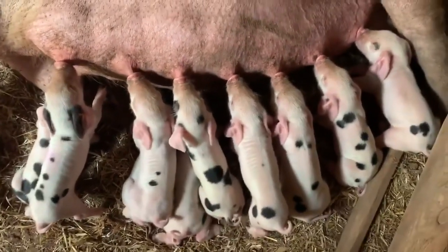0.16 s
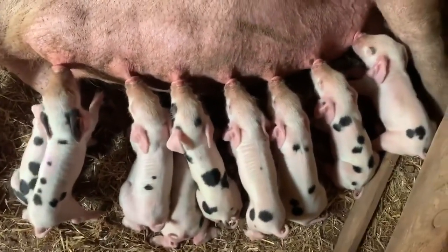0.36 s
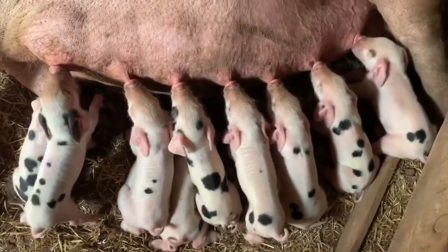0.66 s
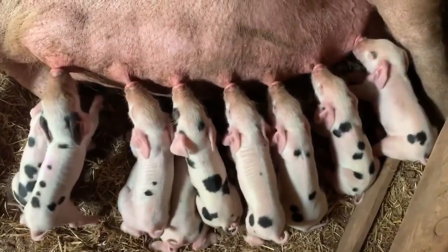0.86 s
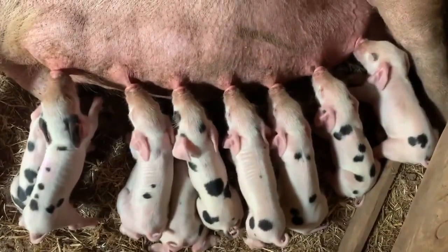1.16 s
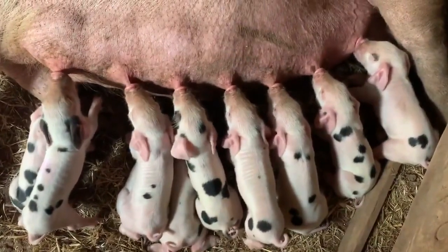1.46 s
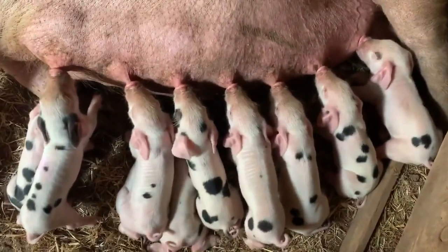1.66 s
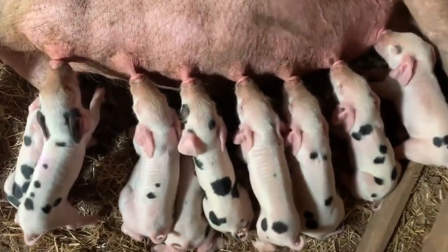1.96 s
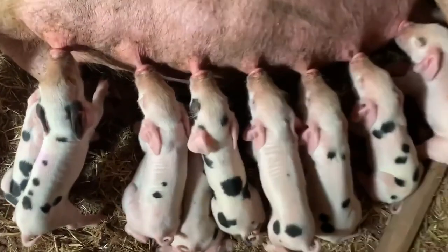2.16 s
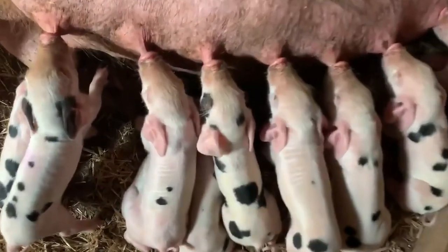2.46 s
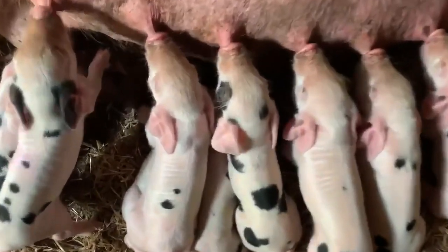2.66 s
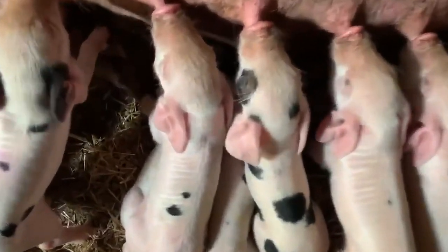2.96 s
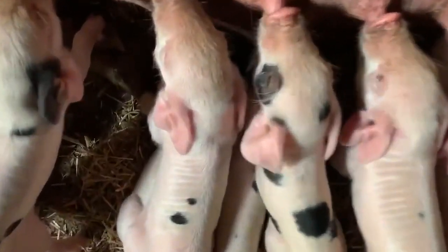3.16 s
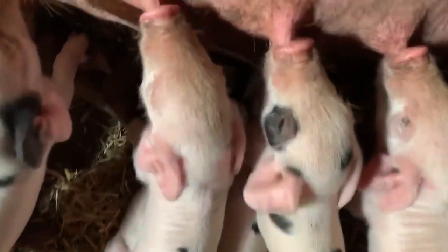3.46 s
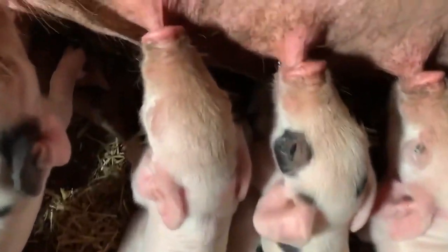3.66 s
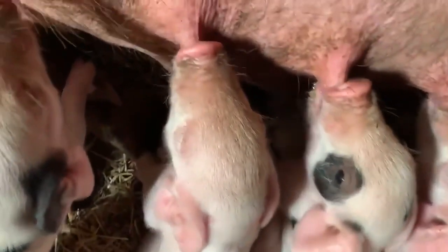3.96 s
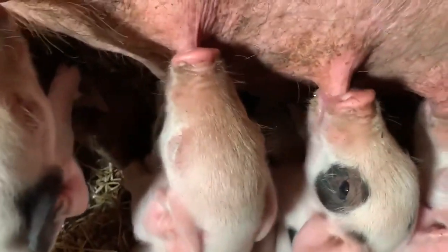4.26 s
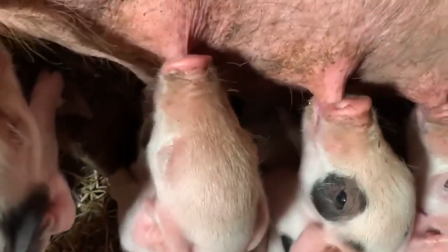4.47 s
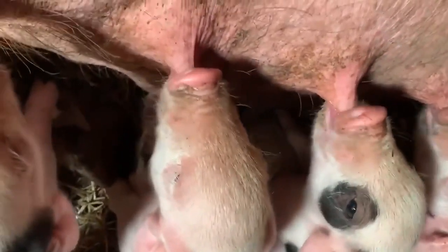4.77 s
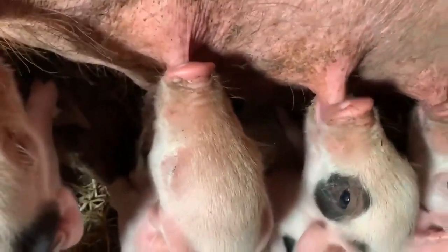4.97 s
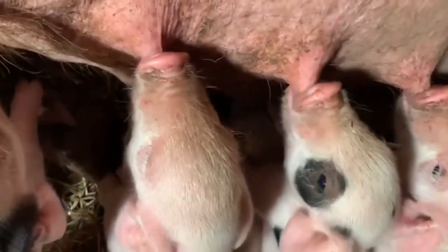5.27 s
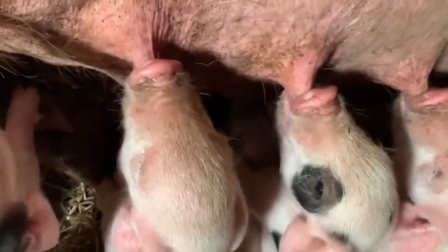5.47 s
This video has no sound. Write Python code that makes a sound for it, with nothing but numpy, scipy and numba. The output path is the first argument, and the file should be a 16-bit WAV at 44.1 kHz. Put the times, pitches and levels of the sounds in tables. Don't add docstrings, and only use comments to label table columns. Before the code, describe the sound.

Rhythmic throaty pig grunts, about one every three quarters of a second, growing closer and louder over faint suckling clicks and straw rustle.

```python
import sys
import numpy as np
from scipy import signal
from scipy.fft import rfft, irfft, next_fast_len
from scipy.io import wavfile
from scipy.ndimage import uniform_filter1d
from numba import njit

SR = 44100
rng = np.random.default_rng(int(sys.argv[2]) if len(sys.argv) > 2 else 0)


def dump_mix(stems):
    frames = np.atleast_2d(stems).T
    limited = np.clip(frames, -1, 1)
    pcm = np.round(limited * 32767).astype(np.int16)
    wavfile.write(sys.argv[1], SR, pcm)


def volts_from_decibels(level):
    exponent = np.asarray(level, float) / 20
    return 10 ** exponent


N = 247842


def rms_one(x):
    return x / np.sqrt(np.mean(x ** 2) + 1e-20)


def in_time(rows, fade_s=0.0099):
    s, *columns = np.transpose(rows)
    t = np.arange(N) / SR
    gate = np.clip(np.minimum(t - s[0], s[-1] - t) / fade_s + 1, 0, 1)
    return gate, *[np.interp(t, s, c) for c in columns]


def band(x, low_hz, high_hz):
    return signal.sosfilt(signal.butter(2, [low_hz, high_hz], "band", fs=SR, output="sos"), x)


def low_pass(x, hz):
    return signal.sosfilt(signal.butter(4, hz, fs=SR, output="sos"), x)


def resonate(x, modes):
    out = 0
    for k, (hz, width_hz, db) in enumerate(modes):
        r = np.exp(-np.pi * width_hz / SR)
        gain = volts_from_decibels(db) * (-1) ** k * (1 - r * r) / 2
        poles = [1, -2 * r * np.cos(2 * np.pi * hz / SR), r * r]
        out = out + signal.lfilter([gain, 0, -gain], poles, x + 1e-18)
    return out


def drift(rate):
    r = np.exp(-80 * np.pi * rate / SR)
    slow = signal.lfilter([1], [1, -2 * r, r * r], rng.standard_normal(N // 40 + 2002))[2000:]
    return np.interp(np.arange(N) / 40, np.arange(len(slow)), rms_one(slow))


PORTS_ALIKE_BELOW_HZ, PORT_LAG_S = 325, 0.00012
ALIKE_AGAIN_HZ, TREBLE_LIKENESS = 3820, 0.62


def port_noise(size, colour=((20, 0), (20000, 0))):
    length = next_fast_len(size)
    shared, *own = rfft(rng.standard_normal((3, length)))
    hz = np.arange(len(shared)) * SR / length + 1
    treble = np.clip(TREBLE_LIKENESS, 0, .95) / (1 + (ALIKE_AGAIN_HZ / hz) ** 4)
    alike = np.minimum(1 / (1 + (hz / PORTS_ALIKE_BELOW_HZ) ** 4) + treble, 1)
    lagged = shared * np.exp([[-1j], [1j]] * hz * np.pi * PORT_LAG_S)
    colour_hz, colour_db = np.transpose(colour)
    gain = volts_from_decibels(np.interp(np.log(hz), np.log(colour_hz), colour_db))
    both = np.sqrt(alike) * lagged + np.sqrt(1 - alike) * np.array(own)
    return irfft(gain * both, length)[:, :size]


def coloured(points, patchy_db, rate):
    hz, db = np.transpose(points)
    edges = np.geomspace(hz[0], hz[-1], round(3 * np.log2(hz[-1] / hz[0])) + 1)
    white = [port_noise(N), port_noise(N)]
    levels = np.interp(np.log(edges[1:] * edges[:-1]) / 2, np.log(hz), db)
    out = 0
    for k, level in enumerate(levels):
        flicker = volts_from_decibels(level + patchy_db * drift(rate))
        out = out + flicker * band(white[k % 2], edges[k], edges[k + 1])
    return rms_one(out)


def shed(x, wet_db, lags, late_db=-9):
    t = np.arange(int(.4 * SR)) / SR
    decay = volts_from_decibels(-60 * t / 0.059) + volts_from_decibels(late_db - 60 * t / 0.27)
    tail = port_noise(len(t)) * decay * (t > .001)
    tail = volts_from_decibels(wet_db) * tail / np.sqrt(np.sum(tail ** 2) / 2)
    tail[[0, 1], lags] += 1
    spectrum = rfft(tail)
    energy = np.sum(tail ** 2, axis=1, keepdims=True)
    colour = np.sqrt(uniform_filter1d(np.abs(spectrum) ** 2, size=60) / energy)
    tail = irfft(spectrum / colour)[:, :-2000]
    return signal.fftconvolve(x[None], tail, axes=1)[:, :N]


# time
# in seconds, level in dB.
SHED_AIR = [(0, -66.5), (.41, -64), (.81, -58.5), (1.2, -69.5), (1.45, -62.5), (1.91, -73.5), (2.28, -62),
            (2.91, -59.5), (3.09, -51), (3.45, -58.5), (4.05, -63), (4.44, -64), (5.27, -60.5), (5.62, -70)]
# frequency in Hz, level in dB per Hz.
SHED_AIR_COLOUR = [(15, -54), (25, -19.5), (54, 2), (76, -15.5), (145, -7), (178, -15.5), (256, -0.5),
                   (375, -11.5), (459, -16), (790, -22.5), (1110, -22.5), (1300, -22.5), (1740, -21.5),
                   (4200, -27.5), (5500, -28), (7150, -51.5), (12100, -120)]


def air():
    gate, murmur_db = in_time(SHED_AIR)
    rumble_db = -59 + 0.65 * (murmur_db - murmur_db.mean())
    noise = coloured(SHED_AIR_COLOUR, patchy_db=6.0, rate=10.6)
    murmur = volts_from_decibels(murmur_db) * rms_one(band(noise, 273, 11000))
    return murmur + volts_from_decibels(rumble_db) * rms_one(band(noise, 20, 246))


# time in seconds, level in dB.
STRAW_BUSTLE = [(0.0, -71), (1.27, -76), (1.39, -75), (1.56, -72), (1.8, -77.5), (2.13, -76.5),
                (2.33, -80.5), (2.99, -62.5), (3.13, -62.5), (3.5, -67.5), (3.93, -66.5), (4.21, -69),
                (4.38, -74), (4.82, -64), (4.98, -66.5), (5.2, -78), (5.37, -67.5), (5.62, -64)]
# frequency in Hz, level in dB.
STRAW_COLOUR = [(4000, -33), (5000, -26), (6000, -3), (7500, -3.5), (9500, -6.5), (11000, -5.5), (12300, 1),
                (13500, -1.5), (15300, 3), (16000, -27)]


def rustle():
    gate, middle_db = in_time(STRAW_BUSTLE)
    top_db = -75 + 0.62 * (middle_db - middle_db.mean())
    hiss = port_noise(N, STRAW_COLOUR) * volts_from_decibels(1.8 * drift(27) + 3.5 * drift(9))
    narrow = band(hiss, 7140, 7260) * volts_from_decibels(5.4 * drift(24))
    wide = band(hiss, 5200, 11650) * volts_from_decibels(1.44 * drift(22.0))
    top = volts_from_decibels(top_db + 1.9 * drift(8.3)) * rms_one(band(hiss, 11500, 15400))
    return volts_from_decibels(middle_db) * rms_one(narrow - wide) + top


# first full flap in seconds, strength in dB, flap period in seconds,
# gain of later flaps in dB per flap, brightness in dB.
SOW_GRUNTS = [
    (.085, -21, 0.046, -0.7, 0),
    (.61, -21.5, 0.046, 0.6, 1.5),
    (1.483, -19.5, .048, 1.36, 0.5),
    (2.271, -20, 0.047, 1.6, 0.6),
    (3.112, -15, 0.044, -0.95, -3),
    (3.885, -16, .047, 0.1, -1.8),
    (4.662, -16, 0.048, 0, 1.5),
    (5.5, -15.5, 0.044, -0.5, -1.2),
]
# last warm-up flap earlier by seconds, level in dB.
GRUNT_WARM_UPS = [
    (.052, -35.5),
    (.051, -45.5),
    (0.054, -35.5),
    (.056, -35.5),
    (0.072, -63),
    (.057, -36),
    (0.073, -36.5),
    (.063, -37),
]
# level in dB, then relative to it
# throat in dB, snout in dB, nostril in dB, lips in dB.
FLAP_COLOURS = [
    (-14, -1, -18.5, -55, -55.5),
    (0.6, -8, -20, -24.5, -38),
    (-5, -11.5, -15.5, -12, -14.5),
    (0.37, -8.5, -13, -18, -23.5),
    (-3, -7, -16.5, -24.5, -30),
    (-13.5, -12, -21, -16, -27),
]


def flaps():
    rows = []
    scatters = rng.standard_normal((len(SOW_GRUNTS), 6, 5))
    for grunt, (lead_s, lead_db), scatter in zip(SOW_GRUNTS, GRUNT_WARM_UPS, scatters):
        s, db, period_s, later_db, bright_db = grunt
        quick_s = 0.92 * period_s
        second = s + period_s
        times = [s - lead_s - 0.036, s - lead_s, s, second, second + quick_s, second + 2 * quick_s]
        levels = np.array(FLAP_COLOURS) + 0.87 * scatter
        levels[:, 0] += [lead_db, lead_db, db - later_db, db, db + later_db, db + 2 * later_db]
        levels[:, 3:] += bright_db
        rows += [(at, *level) for at, level in zip(times, levels) if .01 < at < N / SR]
    return rows


# frequency in Hz, width in Hz, level in dB.
THROAT_MODES = [
    [(271, 122, 1), (364, 155, 2), (604, 66, -2.5)],
    [(270, 38, 5.5), (409, 213, -6.5), (560, 124, -5.5)],
]
SNOUT_MODES = [
    [(892, 126, 1.3), (1045, 30, -3)],
    [(826, 45, -1), (992.4, 45.4, 2.5)],
]
NOSTRIL_MODES = [
    [(1462, 59, 0.85), (1840, 38, 5.5)],
    [(1464, 46, -10.5), (1887.5, 31, 0)],
]
LIP_MODES = [
    [(2250, 500, 2), (2670, 96, 11.5), (3350, 230, -11.5), (3640, 130, 1.5), (4240, 2500, -14)],
    [(2260, 150, -2.5), (2564, 140, 6.5), (2865, 160, -1.5), (3260, 33, -4), (3500, 120, -4),
     (4750, 210, -6)],
]
# throat in dB, snout in dB, nostril in dB, lips in dB.
NEAR_GAINS = (-0.5, 1, 2, -3.5)
HEAD_TURN_S = 2.8


def sow():
    size = int(.25 * SR)
    t, out = np.arange(size) / SR, np.zeros(N + size)
    rows = flaps()
    puffs = rng.standard_normal((len(rows), size))
    airways = (THROAT_MODES, SNOUT_MODES, NOSTRIL_MODES, LIP_MODES)
    rises = (0.0019, 0.0042, 0.009, 0.008)
    lengths = (0.016, 0.0074, 0.008, 0.0069)
    leads = (0.0041, 0.00296, 0.008, 0.0066)
    for (s, peak_db, *band_db), puff in zip(rows, puffs):
        near = int(s > HEAD_TURN_S)
        gains = band_db + near * np.array(NEAR_GAINS)
        for airway, db, rise_s, puff_s, lead_s in zip(airways, gains, rises, lengths, leads):
            modes = airway[near]
            gust = puff * (1 - np.exp(-(t / rise_s) ** 2)) * np.exp(-t / puff_s)
            rung = 0
            for k, (hz, width_hz, mode_db) in enumerate(modes):
                ring = rms_one(resonate(gust, [(hz, width_hz, 0)]))
                rung = rung + (-1) ** k * volts_from_decibels(mode_db) * np.sqrt(width_hz) * ring
            rung = band(rung, 0.59 * modes[0][0], 1.2 * modes[-1][0])
            at = round((s - lead_s) * SR)
            out[at:at + size] += volts_from_decibels(peak_db + db - 7.5) * rung / np.sqrt(np.mean(rung[:1300] ** 2))
    return low_pass(out[:N], 7200)


# peak in seconds, deep boom in dB, upper chest in dB.
CHEST_THUDS = [
    (0.201, -35.5, -36.5),
    (.732, -37, -44),
    (1.624, -34, -35.5),
    (2.408, -33, -39),
    (3.227, -32.5, -35),
    (4.04, -34.5, -37),
    (4.822, -36.5, -35),
    (5.602, -37, -35),
]


def chest():
    deep = rms_one(resonate(rng.standard_normal(N), [(45, 14.1, 2.85), (69.5, 25.0, 0.56)]))
    upper = resonate(rng.standard_normal(N), [(109.5, 8.7, 0.017), (154.5, 14.3, 0.049)])
    upper = rms_one(band(upper, 90, 205))
    murmur = rms_one(band(resonate(port_noise(N), THROAT_MODES[0]), 210, 700)) * volts_from_decibels(4.0 * drift(15))
    rasp = resonate(port_noise(N), [(1720, 190, -17.5), (3900, 480, -5)])
    murmur = murmur + volts_from_decibels(-6.0) * rms_one(band(rasp, 1000, 7100))
    out = 0
    for s, deep_db, upper_db in CHEST_THUDS:
        after = np.arange(N) / SR - s
        deep_db = deep_db + np.minimum(108 * after, -210 * after)
        upper_db = upper_db + np.minimum(100 * after, -274 * after)
        breath = (np.abs(after) < .3) * volts_from_decibels(0.76 * upper_db - 23.5) * murmur
        out = out + volts_from_decibels(deep_db) * deep + volts_from_decibels(upper_db) * upper + breath
    return out


# time in seconds, peak in dB, pitch in
# Hz, t60 in seconds.
NEAR_TICKS = [(0.2888, -52, 6600, 0.02), (0.4514, -47, 10600, 0.047), (1.45, -42, 8450, 0.06),
              (1.934, -52, 9100, 0.02), (2.4992, -47.5, 14500, 0.02), (3.054, -34.5, 15300, 0.023),
              (3.1038, -41, 15200, 0.041), (3.1205, -39, 8750, 0.028), (3.2705, -35.5, 9890, 0.02),
              (3.4607, -46, 7750, 0.018), (3.47, -41.5, 7300, 0.17), (3.702, -46.5, 9100, 0.03),
              (3.971, -44, 14900, 0.033), (4, -46.5, 6500, 0.066), (4.1694, -49, 14800, 0.02),
              (4.2096, -47, 15400, 0.016), (4.301, -48.5, 5700, 0.028), (4.3874, -45, 15100, 0.03),
              (4.4438, -41, 14700, 0.038), (4.462, -43.5, 7550, 0.041), (4.4935, -45, 14900, 0.012),
              (4.7301, -60, 5900, 0.016), (4.761, -45, 6530, 0.018), (4.9405, -39, 8900, 0.12),
              (5.1343, -43, 15400, 0.13), (5.2185, -47, 6300, 0.017), (5.2814, -47.5, 8450, 0.022),
              (5.3105, -43, 14800, 0.017), (5.4205, -48, 8400, 0.02), (5.4565, -49.5, 8240, 0.014)]
# time in seconds, peak in dB, pitch in Hz, t60 in seconds.
LIP_SMACKS = [(1.453, -44, 1770, 0.017), (1.79, -51, 3470, 0.029), (2.6787, -52, 2060, 0.09),
              (3.553, -39, 2400, 0.023), (3.8183, -36.5, 2570, 0.0045), (4.585, -44, 950, 0.0044),
              (4.8837, -42, 1530, 0.018), (5.1665, -49, 1170, 0.026), (5.225, -41.5, 1105, 0.027),
              (5.233, -40.5, 960, 0.06), (5.213, -44.5, 3040, 0.06)]


def near_noises(events, sharpness, broad_db):
    size = int(.08 * SR)
    t, out = np.arange(size) / SR, np.zeros((2, N + size))
    for s, db, hz, t60 in events:
        colour = STRAW_COLOUR if hz > 5500 else ((300, -15.5), (16000, 0))
        burst = port_noise(size, colour) * volts_from_decibels(-60 * t / max(t60, .002)) * (1 - np.exp(-t / 0.00033))
        rung = resonate(burst, [(hz, hz / sharpness, 0)])
        rung = rung / np.abs(rung).max() + volts_from_decibels(broad_db) * burst
        at = round(s * SR)
        out[:, at:at + size] += volts_from_decibels(db) * rung
    return out[:, :N]


@njit
def moving_resonance(x, hz, r, rate):
    out = np.zeros(len(x))
    for i in range(2, len(x)):
        ring = 2 * r * np.cos(2 * np.pi * hz[i] / rate) * out[i - 1] - r * r * out[i - 2]
        out[i] = x[i] - x[i - 2] + ring
    return out


# start in seconds, attack in seconds, hold in seconds, level in dB,
# widest mouth resonance in Hz.
FAR_GRUNTS = [
    (.385, .02, 0.017, -68.5, 317),
    (0.871, 0.039, 0.009, -46, 560),
    (1.025, 0.0055, 0.03, -60, 387),
    (1.175, 0.046, 0.049, -43, 585),
    (2.929, 0.066, 0.029, -39.5, 547),
    (5.004, 0.0068, 0.011, -65.5, 330),
]
# pulses per second, mouth sinking in Hz per second, throat in dB, snort in dB,
# chest in dB.
FAR_VOICES = [
    (60.3, 100, -0.5, -29, 5),
    (76.4, 896, -5.5, -18.5, -3),
    (63.4, -300, -2, -40, -31),
    (70.8, 1802, -10.5, -18, 5),
    (53.1, 502, -18, -35, -11),
    (59, 97, 0.5, -45, -15),
]


def other_pigs(rough=.5, width_hz=68):
    out, noise = 0, rng.standard_normal((3, N))
    snort = resonate(noise[1], [(3890, 280, 7.5), (4370, 570, 1), (6600, 1500, -5.5)])
    snort = rms_one(band(snort, 3200, 8200))
    hiss = resonate(noise[2], [(850, 110, 2.5), (1190, 550, 1.5), (1964, 390, -9)])
    hiss = rms_one(band(hiss, 810, 1800))
    for (s, attack_s, hold_s, db, mouth_hz), voice_row in zip(FAR_GRUNTS, FAR_VOICES):
        per_s, sink_hz, throat_db, snort_db, chest_db = voice_row
        fading = s + attack_s + hold_s
        end = (fading + 30 / 521, db - 27.5)
        gate, db = in_time([(s, db - 8), (s + attack_s, db), (fading, db), end], fade_s=0.00398)
        since = np.clip(np.arange(N) / SR - s, 0, .2)
        mouth_hz = np.maximum(mouth_hz - sink_hz * np.maximum(since - attack_s, 0), 300)
        throat_db = throat_db + np.minimum(145 * since, 18.5)
        chest_db = chest_db + np.minimum(706 * (since - attack_s - hold_s / 2), 0)
        cycles = np.cumsum(gate * per_s * (1 + 0.18 * drift(35))) / SR + 1.0
        puff = 1.19 + np.cos(np.pi * (cycles % 1)) ** 2
        pulses = np.diff(np.floor(cycles), prepend=0) * np.sqrt(SR / per_s)
        source = gate * (pulses + rough * noise[0] * puff)
        voice = 0
        for hz, level_db in ((mouth_hz, 0), (255, throat_db), (155, chest_db)):
            rung = source
            for _ in range(2):
                rung = moving_resonance(rung, hz + np.zeros(N), np.exp(-np.pi * width_hz * 1.5 / SR), float(SR))
            rung = rung / np.sqrt(np.mean(rung[gate > 0] ** 2))
            even = rung / np.sqrt(uniform_filter1d(rung ** 2, 1800) + .01)
            voice = voice + volts_from_decibels(level_db) * even
        breath = volts_from_decibels(snort_db + 1.1 * (db - db.max())) * snort + volts_from_decibels(-21 + 0.38 * (snort_db + 22)) * hiss
        out = out + gate * volts_from_decibels(db) * (voice + puff * breath)
    return out


# start in seconds, length in seconds, first pitch in Hz, last pitch in Hz,
# level in dB.
SPARROW_CHIRPS = [
    (0.388, .09, 2380, 2007, -74),
    (0.538, 0.031, 3730, 3640, -67),
    (0.832, 0.069, 2865, 2516, -69.5),
    (1.043, .12, 2960, 2580, -73.5),
    (3.235, .05, 2700, 2670, -65),
]


def sparrows():
    out = 0
    for s, length_s, first_hz, last_hz, db in SPARROW_CHIRPS:
        rise = 0.66
        start = (s, first_hz, db - 1)
        top = (s + rise * length_s, first_hz + rise * (last_hz - first_hz), db)
        end = (s + length_s, last_hz, db - 14.5)
        gate, hz, db = in_time([start, top, end], fade_s=0.0054)
        phase = 2 * np.pi * np.cumsum(hz * (1 + .03 * drift(250))) / SR
        whistle = np.sin(phase) + volts_from_decibels(-12) * np.sin(2 * phase)
        out = out + gate * volts_from_decibels(db + 3 + 4 * drift(150)) * whistle
    return out


# time in seconds, level in dB.
SNOUT_INHALE = [
    (4.18, -89),
    (4.194, -88),
    (4.366, -72.5),
    (4.46, -90),
]


def inhale():
    gate, db = in_time(SNOUT_INHALE)
    return gate * volts_from_decibels(db + 2.5) * rms_one(resonate(rng.standard_normal(N), NOSTRIL_MODES[1]))


def scene():
    near = shed(sow() + inhale(), wet_db=5.0, lags=[0, 3])
    pigs = shed(other_pigs(), wet_db=2.0, lags=[4, 0]) * volts_from_decibels(np.array([[-2.5], [1.5]]))
    birds = shed(sparrows(), wet_db=13.5, lags=[4, 0], late_db=-11) * volts_from_decibels(-7)
    thuds = chest() * volts_from_decibels(np.array([[-.4], [.4]]))
    ticks = near_noises(NEAR_TICKS, sharpness=2.15, broad_db=-18)
    smacks = near_noises(LIP_SMACKS, sharpness=9.1, broad_db=-24)
    return near + pigs + birds + thuds + ticks + smacks + rustle() + air()


def top_cut(x):
    return signal.sosfilt(signal.butter(12, 16630, fs=SR, output="sos"), x)


def record(dry):
    cut = signal.sosfilt(signal.butter(4, 36, "high", fs=SR, output="sos"), dry)
    cut = signal.sosfilt(signal.cheby2(10, 60, 16500, fs=SR, output="sos"), cut)
    return top_cut(cut)


dry = scene()
out = record(dry)
dump_mix(out)
```